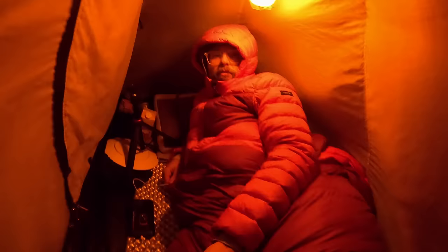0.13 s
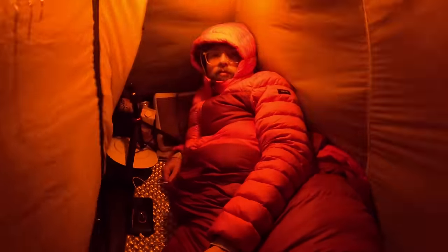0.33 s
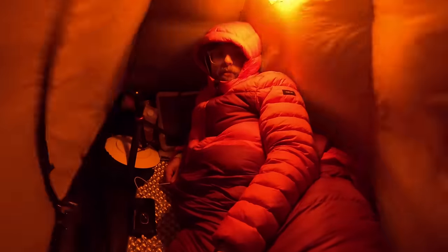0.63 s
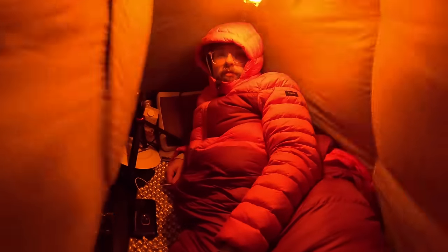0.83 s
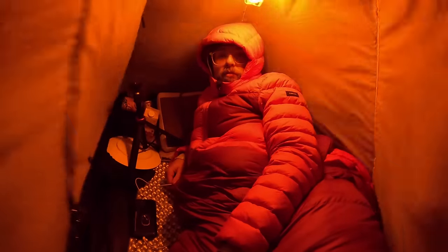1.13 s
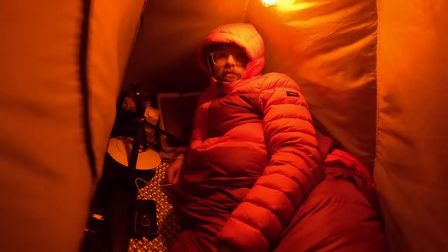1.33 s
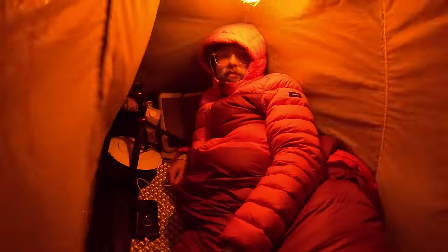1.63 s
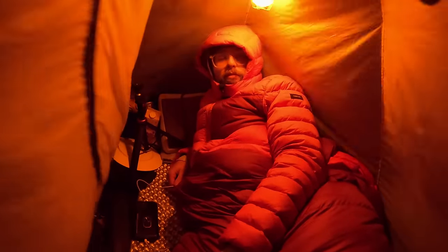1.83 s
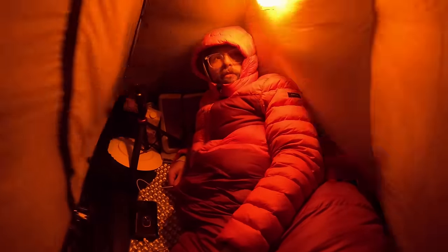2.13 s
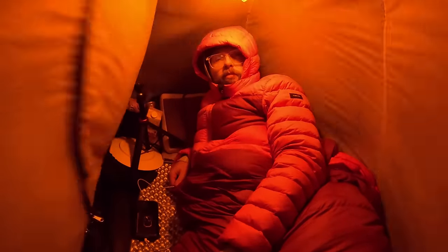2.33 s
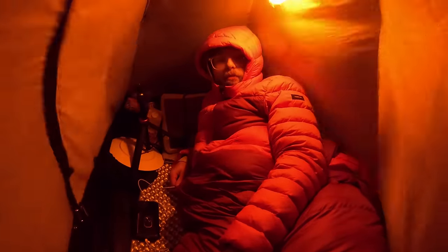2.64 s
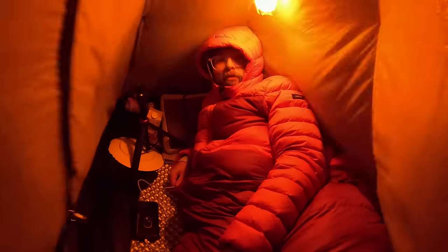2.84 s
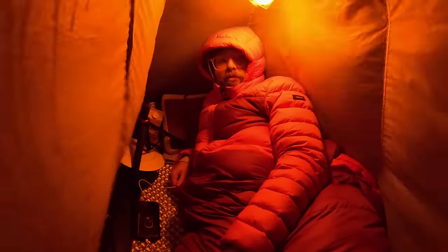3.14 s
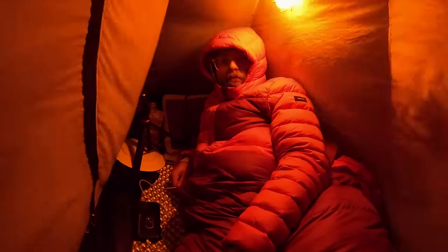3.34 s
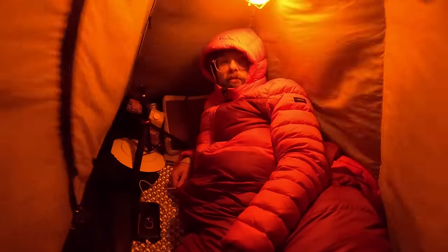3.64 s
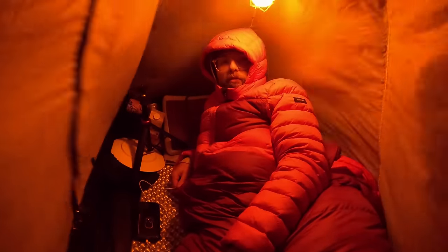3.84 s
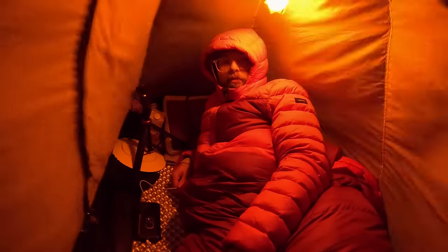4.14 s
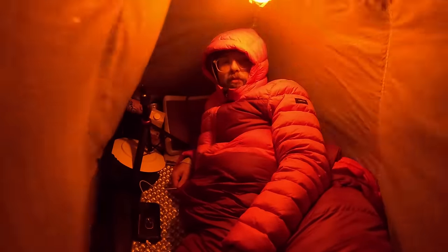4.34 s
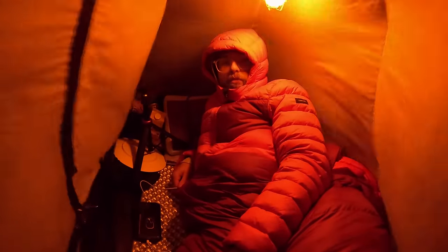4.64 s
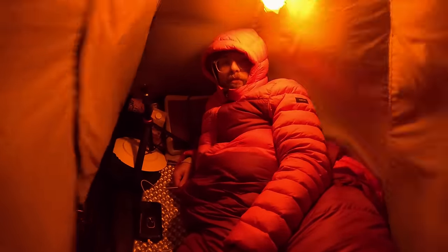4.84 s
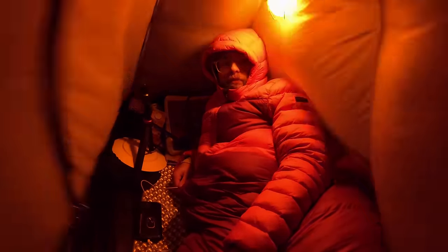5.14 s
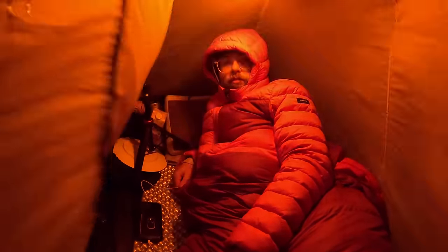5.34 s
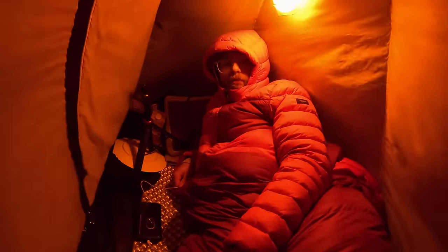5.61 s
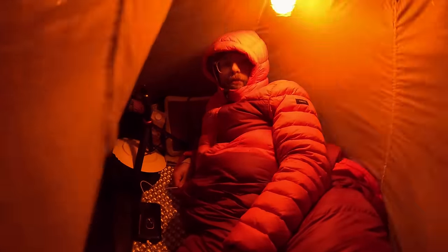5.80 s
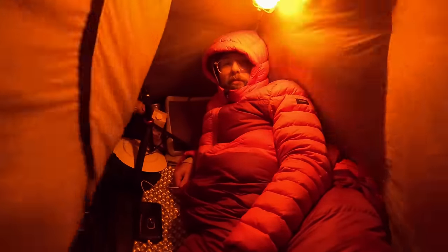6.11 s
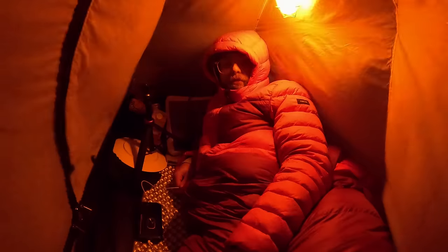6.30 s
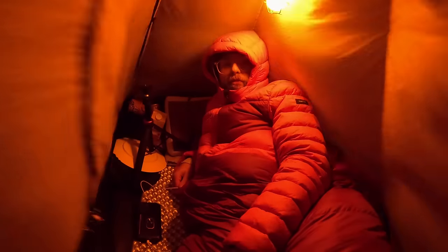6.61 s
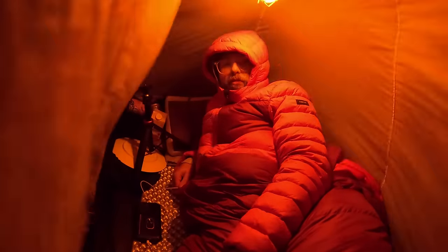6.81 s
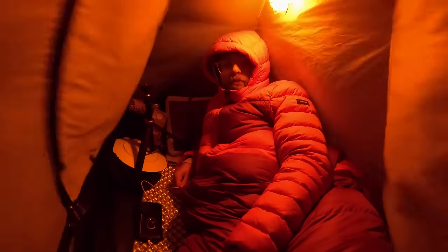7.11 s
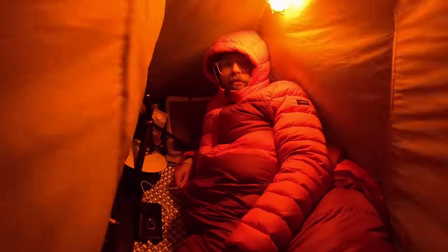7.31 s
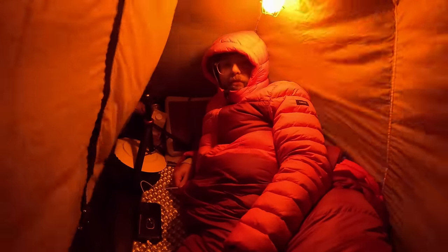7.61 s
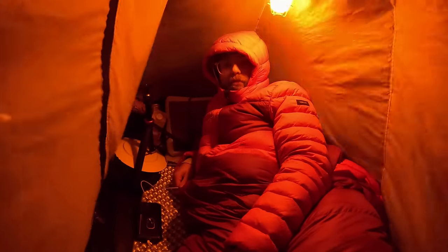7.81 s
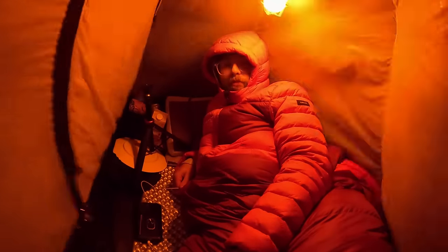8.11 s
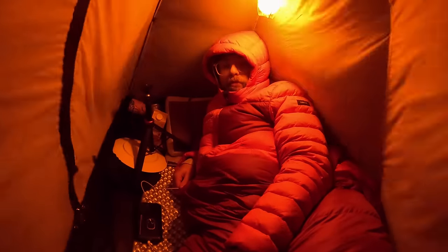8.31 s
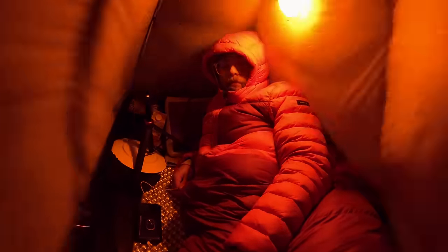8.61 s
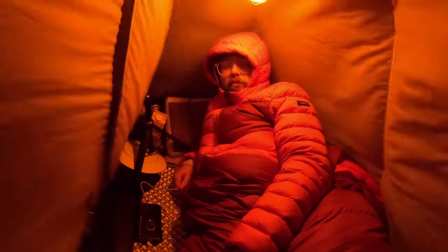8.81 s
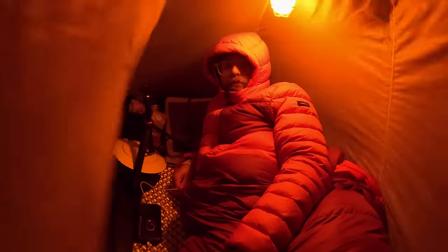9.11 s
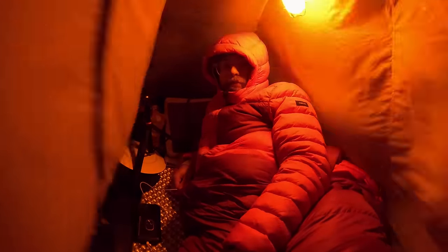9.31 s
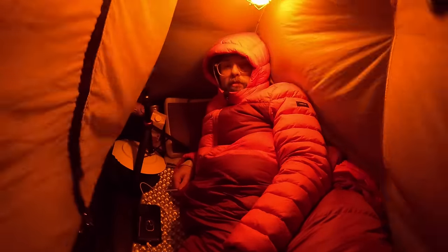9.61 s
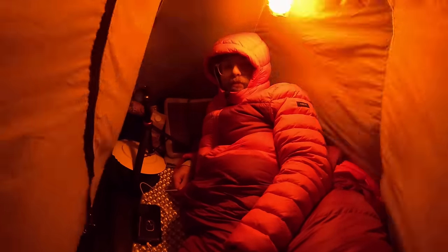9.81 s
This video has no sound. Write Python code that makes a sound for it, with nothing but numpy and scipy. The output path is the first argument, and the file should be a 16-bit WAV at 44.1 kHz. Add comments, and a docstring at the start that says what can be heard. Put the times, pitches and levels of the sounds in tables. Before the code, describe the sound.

Inside a small tent in a gale, fabric walls boom, flap and rustle constantly, with sharp cloth cracks, dull panel thumps and faint zip jingles.

```python
"""Inside a small tent in a gale: the walls boom, flap and rustle, and small things snap on top.
Boom, flapping roar and rustle are banded stereo noise that swells with heaves, flaps and sweeps; snaps crackle in the rustle.
Taut cloth cracks (ringing knock plus torn noise), slack panels thump (short pitched puffs over a low push of air),
and zip pulls jingle (decaying sine modes). A small stereo microphone cuts the deep bass and has dips near 4 and 11 kHz."""
import sys
import numpy as np
from scipy import signal
from scipy.io import wavfile

SR = 44100
rng = np.random.default_rng(int(sys.argv[2]) if len(sys.argv) > 2 else 0)


def output_pcm(signal):
    """Save a mono or channel-first signal as 16-bit PCM at the path in sys.argv[1].

    Samples are clipped to [-1, 1] before scaling.
    """
    pcm = np.clip(np.atleast_2d(signal).T, -1, 1) * 32767
    wavfile.write(sys.argv[1], SR, np.round(pcm).astype(np.int16))


N = 438794   # length in samples

# Strength of the gale between the single swells. Each row: time in seconds, flapping in dB, rustle in dB.
GALE_STRENGTH = [(0.0, -24.5, -32.5), (0.61, -24.5, -38), (0.83, -32, -42), (1.13, -25.5, -49),
                 (2.77, -29.5, -32), (3.55, -26.5, -37), (4.1, -25, -40.5), (4.41, -25.5, -38),
                 (4.8, -19, -36), (5.06, -26, -36.5), (5.99, -27.5, -40.5), (6.76, -20, -31),
                 (7.32, -28, -34.5), (8.34, -23, -34.5), (8.62, -23, -30), (9.36, -38, -38),
                 (9.95, -20.5, -30.5)]
BOOM_DB, BOOM_FOLLOWS = -18.5, 0.72   # boom at the mean flapping level, share of the flapping's dB swing

# A wall shoves the air inside. Each row: peak time in seconds, boom level in dB, length in seconds.
WALL_HEAVES = [(0.616, -14.5, 0.53), (0.899, -21, 0.027), (1.039, -14, 0.081), (1.326, -13, 0.058),
               (1.504, -12.5, 0.066), (1.794, -12.5, 0.091), (2.261, -5, 0.024), (2.703, -15, 0.43),
               (2.935, -13.5, 0.24), (3.2, -12, 0.064), (3.895, -14.5, 0.4), (4.155, -19, 0.075),
               (4.721, -17, 0.25), (5.01, -10, 0.059), (5.216, -17, 0.16), (6.309, -11, 0.11),
               (7.136, -15, 0.1), (7.492, -12, 0.033), (8.14, -10, 0.079), (8.347, -15, 0.25),
               (8.688, -10.5, 0.056), (9.057, -10.5, 0.12), (9.359, -18, 0.61), (9.622, -14, 0.12)]
# A wall billows and whips back. Each row: peak time in seconds, flapping level in dB, length in seconds.
WALL_FLAPS = [(0.232, -18.5, 0.14), (0.466, -16, 0.039), (0.621, -17, 0.48), (1.357, -21.5, 0.25),
              (1.914, -20, 0.22), (2.027, -21.5, 0.072), (2.252, -20, 0.42), (2.42, -12.5, 0.05),
              (2.844, -17.5, 0.75), (3.295, -16.5, 0.13), (3.839, -16, 0.31), (4.73, -20.5, 0.32),
              (5.017, -12.5, 0.025), (5.19, -21.5, 0.093), (5.511, -21.5, 0.08), (5.887, -22, 0.1),
              (6.269, -18, 0.11), (6.407, -10.5, 0.031), (6.59, -11, 0.08), (6.9, -12, 0.058),
              (7.421, -19, 0.087), (8.035, -13.5, 0.15), (8.52, -18.5, 0.065), (8.934, -16, 0.088),
              (9.212, -22.5, 0.57), (9.586, -19, 0.092), (9.806, -20, 0.13)]
# Cloth drags over cloth, or snow sweeps the walls. Each row: peak time in seconds, rustle level in dB,
# length in seconds.
CLOTH_SWEEPS = [(0.732, -31, 0.47), (1.095, -35.5, 0.3), (1.766, -35, 1), (2.033, -31, 0.2),
                (2.321, -34, 0.55), (2.698, -32, 0.19), (3.059, -30, 0.053), (3.703, -33, 0.11),
                (3.994, -31.5, 0.22), (4.683, -27.5, 0.35), (5.008, -24, 0.039), (5.246, -32, 0.41),
                (5.75, -47.5, 0.82), (5.909, -37.5, 0.1), (6.526, -29.5, 0.09), (6.9, -30, 0.13),
                (7.53, -33, 0.061), (8.074, -34, 0.063), (8.565, -34, 0.4), (8.956, -29, 0.065),
                (9.516, -30, 0.084), (9.676, -30, 0.079)]
RISE_SHARE, EDGE_DB = 0.52, 8.5   # share of a swell's length before its peak; drop at both ends of the length

# Colour of the boom. Each row: frequency in Hz, density in dB per Hz.
BOOM_SPECTRUM = [(22, -3), (40, -29), (50, -42), (62, 2.5), (90, 4), (140, -6), (200, -9.5), (300, -19.5)]
# Colour of the flapping. Each row: frequency in Hz, density in dB per Hz.
FLAP_SPECTRUM = [(120, -5), (200, -2), (400, -2), (700, -9), (1150, -11), (1800, -21.5), (2600, -32.5)]
# Colour of the rustle. Each row: frequency in Hz, density in dB per Hz.
RUSTLE_SPECTRUM = [(1200, 2.5), (1900, -1.5), (2900, -0.5), (4700, -6.5), (6500, -5.5), (9300, -12),
                   (11000, -35), (14200, -24), (15400, -26)]
TICKS_PER_S, TICK_DB = 200, -2   # crackle of the cloth: average rate, gain where it joins the rustle

# Stereo width of the cloth noise. Each row: frequency in Hz, left-right likeness from 0 to 1.
STEREO_LIKENESS = [(90, .99), (160, .95), (300, .975), (600, .9), (1400, .74), (2800, .56), (5600, .64),
                   (9000, .38), (12000, 0)]
# Stereo balance. Each row: frequency in Hz, left level over right in dB.
STEREO_LEAN = [(60, .5), (200, .2), (400, .6), (800, 2), (1500, 3.4), (2500, 3.4), (4500, 1.8), (8000, 3),
               (13000, 9)]
LEFT_LATE, LATE_BELOW_HZ = 2, 3500   # samples by which the left hears late; pitch limit for the cloth noise

# Cloth cracking taut. Each row: start in seconds, knock strength in dB, tear strength in dB.
CLOTH_CRACKS = [(0.2127, -17, -25), (0.3387, -18, -22.5), (0.465, -18, -29), (0.5605, -28, -36),
                (0.725, -21, -18), (1.278, -23, -15.5), (1.478, -13, -30), (1.646, -24, -26),
                (2.305, -13, -14.5), (2.455, -16.5, -22), (3.061, -19, -14), (3.452, -26, -40),
                (3.609, -16, -29), (3.6398, -18, -24), (3.69, -16, -30), (3.988, -26, -18.5),
                (4.102, -23, -42), (4.385, -22, -43), (4.4628, -18, -18), (4.6227, -20, -21),
                (4.647, -20, -35), (4.6654, -24, -22), (4.687, -13, -33), (4.707, -12.5, -37),
                (4.726, -18, -38), (4.752, -12, -35), (4.771, -20, -38), (4.888, -25, -26),
                (4.9147, -15, -22), (4.969, -17, -17), (5.0146, -10, -12), (5.05, -27, -38),
                (5.0945, -26, -39), (5.6397, -44, -28), (5.7084, -12, -15.5), (5.778, -40, -24),
                (5.81, -21, -31), (5.979, -37, -26), (6.138, -28, -26), (6.168, -24, -32), (6.514, -9, -16),
                (6.9, -11, -20), (6.944, -7.5, -33.5), (7.0107, -7, -21), (7.079, -15, -15.5),
                (7.4626, -17, -39), (7.529, -15.5, -17.5), (8.067, -11, -12.5), (8.266, -21, -24),
                (8.5682, -7.5, -16), (8.731, -34, -23), (8.757, -11.5, -73), (9.008, -11.5, -16.5),
                (9.225, -32, -27)]
# What a knock rings with. Each row: frequency in Hz, level in dB, time to fall 60 dB in seconds.
KNOCK_MODES = [(2850, 0, .025), (3600, -7, .02), (2350, -12, .015)]
# Slack panels thumping. Each row: start in seconds, slap strength in dB, pitch in Hz.
PANEL_THUMPS = [(0.346, -5, 455), (0.452, -6, 370), (0.558, -12, 610), (1.077, -11, 960), (1.455, -11, 503),
                (1.744, -10, 550), (2.022, -3.5, 380), (2.258, -6.5, 466), (2.304, -16, 810),
                (2.4, -5, 536), (2.417, -3.5, 543), (2.726, -6, 634), (3.018, -7, 420), (3.166, -9.5, 443),
                (3.278, -11, 770), (3.762, -5, 550), (3.79, -7, 328), (3.829, -9, 740), (3.951, -6.5, 840),
                (4.523, -7.5, 440), (4.622, -7.5, 980), (4.674, 0.5, 700), (4.708, -14, 350),
                (4.75, -8, 420), (4.915, -5, 1000), (5.027, -10, 900), (5.094, -8, 1070), (5.499, -21, 430),
                (5.551, -13.5, 516), (5.892, -12, 920), (6.331, -8, 960), (6.4, -10, 410),
                (6.499, -5.5, 1010), (6.563, -2, 403), (6.648, -9.5, 894), (6.904, -2, 1110),
                (7.023, -8, 900), (7.055, -1.5, 403), (7.076, -4, 880), (8.03, -1.5, 443),
                (8.401, -10, 586), (8.572, -6, 418), (8.929, -7, 530), (9.205, -6.5, 386),
                (9.748, -8.5, 890), (9.798, -8, 610), (9.835, -8, 680), (9.938, -4, 690)]
# Zip pulls knocking together. Each row: start in seconds, then the strengths in dB of the first tag's low modes,
# of its top modes, and of the second tag.
ZIP_JINGLES = [(0.548, -25, -63, -47), (0.608, -22, -71, -48), (0.6424, -26, -63, -34),
               (0.691, -28, -62, -35), (0.734, -21, -55, -27), (0.818, -27, -62, -49),
               (0.848, -27, -60, -48), (0.8864, -25, -35, -31), (1.021, -16, -34, -28),
               (1.056, -31, -35, -53), (3.335, -19.5, -35, -42), (3.3687, -45, -70, -27),
               (4.8884, -24, -26, -21), (5.237, -22, -42, -25), (5.255, -23, -26, -47),
               (5.4294, -21, -34, -31), (6.2537, -24, -64, -33), (6.93, -29, -54, -40),
               (6.9814, -23, -55, -41), (7.094, -15, -53, -48), (7.11, -21, -28, -47),
               (8.2716, -21, -31, -23), (8.7316, -19, -21, -21), (9.0244, -32, -50, -22),
               (9.2964, -38, -70, -27)]
# Ringing modes of the zip pulls. Each row: frequency in Hz, level in dB, time to fall 60 dB in seconds,
# and which strength drives it (0 low modes, 1 top modes, 2 second tag).
ZIP_MODES = [(5880, -4, .06, 0), (6140, -9, .05, 0), (8350, -15, .04, 0), (14050, -4, .045, 1),
             (14260, -6, .05, 1), (4700, -9, .07, 2), (9150, -6, .055, 2), (11450, -19, .05, 2)]
RATTLE_S, RATTLE_LOSS_DB = .022, 8   # longest-gap scale, before a random share; mean loss at each bounce

# Dips in the microphone's response. Each row: frequency in Hz, width in Hz, depth from 0 to 1.
MIC_DIPS = [(4003, 490, 1), (10740, 1700, 0.55)]
BASS_CUT_HZ, TREBLE_ROLL_HZ, CUTOFF_HZ = 45, 14100, 15500


def from_db(db):
    """Decibels to gain."""
    return 10 ** (np.asarray(db) / 20)


def rms_one(x):
    """Scale to rms 1."""
    return x / np.sqrt(np.mean(x ** 2) + 1e-20)


def in_time(rows):
    """Columns of a curve, one value per sample."""
    s, *columns = np.transpose(rows)
    return [np.interp(np.arange(N) / SR, s, c) for c in columns]


def at_hz(points, hz):
    """Read a curve on a log-frequency axis."""
    point_hz, value = np.array(points).T
    return np.interp(np.log(hz), np.log(point_hz), value)


def drift(rate_hz):
    """Slow chance: noise at every 40th sample through a double one-pole low-pass; rms 1."""
    r = np.exp(-80 * np.pi * rate_hz / SR)
    noise = rng.standard_normal(N // 40 + 2002)
    slow = signal.lfilter([1], [1, -2 * r, r * r], noise)[2000:]   # skip the filter's start-up
    return np.interp(np.arange(N) / 40, np.arange(len(slow)), rms_one(slow))


def band(x, low_hz, high_hz):
    """Butterworth band-pass."""
    edges_hz = [low_hz, min(high_hz, .45 * SR)]
    return signal.sosfilt(signal.butter(2, edges_hz, "band", fs=SR, output="sos"), x)


def sides(lean_db):
    """Left and right gains for a left-right difference."""
    return from_db(np.array([[.5], [-.5]]) * lean_db)


def swells(rows):
    """Power of bell-shaped swells, each falling off on both sides of its peak."""
    t, power = np.arange(N) / SR, np.zeros(N)
    for s, db, length_s in rows:
        first, last = round((s - 3 * length_s) * SR), round((s + 3 * length_s) * SR)
        near = slice(max(0, first), last)
        reach = length_s * np.where(t[near] < s, RISE_SHARE, 1 - RISE_SHARE)
        power[near] += from_db(db - EDGE_DB * ((t[near] - s) / reach) ** 2) ** 2
    return power


def swelling_gain(steady_db, rows):
    """Add the power of the swells to that of the steady level."""
    return np.sqrt(from_db(2 * steady_db) + swells(rows))


def crumpling(per_s, spread_db, t60, share):
    """Envelope of random folds in the cloth: sudden small bursts of uneven size over a steady part."""
    struck = rng.random(N) < per_s / SR
    sizes = from_db(spread_db * np.minimum(rng.exponential(1, N), 4)) * struck
    bursts = signal.lfilter([1], [1, -from_db(-60 / (t60 * SR))], sizes + 1e-18)
    share = np.clip(share, 0, 1)
    return rms_one(1 - share + share * rms_one(bursts))


def cloth_noise(spectrum, shared_db, own_db, own_rate, envelope=1):
    """Third-octave bands of stereo noise, each with its level, flicker, likeness and lean; rms 1."""
    low_end, high_end = spectrum[0][0], spectrum[-1][0]
    count = int(3 * np.log2(high_end / low_end)) + 1
    edges = np.geomspace(low_end, high_end, count)
    white = rng.standard_normal((2, 2, N)) * envelope   # neighbouring bands get unrelated noise
    out, together = 0, drift(13.0)
    for k, (low, high) in enumerate(zip(edges, edges[1:])):
        mid, side = band(white[k % 2], low, high)
        hz = np.sqrt(low * high)
        alike = np.clip(at_hz(STEREO_LIKENESS, hz), 0, .99)
        flicker_db = shared_db * together + own_db * drift(own_rate)
        gain = from_db(at_hz(spectrum, hz) + flicker_db)
        pair = np.sqrt(1 + alike) * mid + np.sqrt(1 - alike) * side * [[1], [-1]]
        pair[0] = np.roll(pair[0], LEFT_LATE * (hz < LATE_BELOW_HZ))
        out = out + gain * sides(at_hz(STEREO_LEAN, hz)) * pair
    return rms_one(out)


def boom(flap_db):
    """Walls pump like drum skins: low noise that follows the gale and swells with each heave."""
    steady_db = BOOM_DB + BOOM_FOLLOWS * (flap_db - flap_db.mean())
    noise = cloth_noise(BOOM_SPECTRUM, shared_db=0.6, own_db=0.9, own_rate=4.2)
    return swelling_gain(steady_db, WALL_HEAVES) * noise


def flapping(flap_db):
    """Walls flap and crumple: a mid-range roar roughened by dense folds, swelling with each flap."""
    folds = crumpling(350.0, 5, 0.008, 0.45)
    noise = cloth_noise(FLAP_SPECTRUM, shared_db=0.6, own_db=1.8, own_rate=12.0, envelope=folds)
    return swelling_gain(flap_db, WALL_FLAPS) * noise


def crackle(per_s):
    """Random small snaps of uneven size, each ringing a few cycles at one of ten pitches."""
    struck = rng.random(N) < per_s / SR
    touches = from_db(4.5 * np.minimum(rng.exponential(1, N), 3)) * struck
    out, dealt = 0, rng.integers(0, 10, N)
    for k, hz in enumerate(np.geomspace(1300, 5200, 10)):
        r, w = from_db(-60 * hz / (8 * SR)), 2 * np.pi * hz / SR   # falls 60 dB in 8 cycles
        snaps = touches * (dealt == k) + 1e-18
        ring = signal.lfilter([np.sin(w)], [1, -2 * r * np.cos(w), r * r], snaps)
        out = out + sides(at_hz(STEREO_LEAN, hz) + rng.normal(0, 2)) * ring
    return out


def rustle(rustle_db):
    """Rubbing cloth and blasted snow: bright noise with sparser folds and crackle, swelling with each sweep."""
    folds = crumpling(90.0, 3.5, 0.014, 0.2)
    noise = cloth_noise(RUSTLE_SPECTRUM, shared_db=1.0, own_db=2.1, own_rate=20.0, envelope=folds)
    texture = noise + from_db(TICK_DB) * crackle(TICKS_PER_S)
    return swelling_gain(rustle_db, CLOTH_SWEEPS) * texture


def puff(low_hz, high_hz, rise_s, t60, apart, click):
    """One short stereo burst, mono peak 1: a sudden click, then band noise that dies away; steep skirts."""
    t = np.arange(int(.12 * SR)) / SR
    envelope = (1 - np.exp(-t / rise_s)) * from_db(-60 * t / t60)
    mid, side = rng.standard_normal((2, len(t))) * envelope
    mid[0] = click * np.sqrt(SR / (high_hz - low_hz))   # sized against the noise that the band lets through
    pair = band(mid + apart * side * [[1], [-1]], low_hz, high_hz)
    pair = band(pair, low_hz / 2, high_hz * 1.3)
    return pair / np.abs(pair.mean(axis=0)).max()


def add(out, s, burst):
    """Mix a burst in at time s."""
    at = round(s * SR)
    out[:, at:at + burst.shape[1]] += burst[:, :N - at]


def knock():
    """A brief ring of the knock modes, shifted in pitch and strength every time; peak 1, left late."""
    t, shift = np.arange(int(.12 * SR)) / SR, 1 + rng.normal(0, .05)
    ring = 0
    for hz, db, t60 in KNOCK_MODES:
        decay = from_db(db + rng.normal(0, 3) - 60 * t / t60)
        ring = ring + decay * np.sin(2 * np.pi * (hz * shift * t + rng.random()))
    ring = ring * (1 - np.exp(-t / .0012))   # soft attack
    return np.array([np.roll(ring, LEFT_LATE), ring]) / np.abs(ring).max()


def cracks():
    """A ringing knock near 3 kHz, and a tearing burst with a duller body, each with its own strength."""
    out = np.zeros((2, N))
    for s, knock_db, tear_db in CLOTH_CRACKS:
        snap = .7 * puff(1800, 3800, .0015, .03, apart=.55, click=.8)
        ring = from_db(knock_db - 6) * (knock() + snap)
        tear = from_db(tear_db) * puff(3500, 7600, 0.002, 0.025, apart=0.46, click=.6)
        body = from_db(tear_db + 2.0) * puff(570, 2370, 0.0039, 0.059, apart=.45, click=1)
        add(out, s, sides(2.8) * (ring + body + tear))
    return out


def thumps():
    """A slap of a few cycles around the panel's pitch, with a low push of air under it."""
    out = np.zeros((2, N))
    for s, db, hz in PANEL_THUMPS:
        slap = puff(hz / 1.9, hz * 1.9, .001, .032, apart=.35, click=1.5)
        push = from_db(-7) * puff(140.0, 226, 0.0017, 0.24, apart=0.057, click=1.35)
        add(out, s, sides(0.92) * from_db(db) * (slap + push))
    return out


def jingles():
    """Each knock and its two bounces ring small metal tags, a little off in pitch and strength every time."""
    out, t = np.zeros((2, N)), np.arange(int(.15 * SR)) / SR
    swell = 1 - np.exp(-t / 0.004)   # soft attack
    for s, *strength_db in ZIP_JINGLES:
        touches = np.cumsum([0, *rng.uniform(0.38, 0.85, 2)]) * RATTLE_S
        for hz, mode_db, t60, column in ZIP_MODES:
            pitch = hz * (1 + rng.normal(0, 0.008))
            # close mode pairs beat
            waver = 1 + .6 * np.sin(2 * np.pi * (rng.uniform(60, 250) * t + rng.random()))
            decay = from_db(strength_db[column] + mode_db - 60 * t / t60)
            tone = decay * swell * np.sin(2 * np.pi * pitch * t) * waver
            for k, late_s in enumerate(touches):
                touch_gain = from_db(rng.normal(0, 3) - RATTLE_LOSS_DB * k)
                add(out, s + late_s, sides(at_hz(STEREO_LEAN, hz)) * touch_gain * tone)
    return out


def scene():
    """Boom, flapping and rustle follow the gale; cracks, thumps and jingles sit on top."""
    flap_db, rustle_db = in_time(GALE_STRENGTH)
    walls = boom(flap_db) + flapping(flap_db) + rustle(rustle_db)
    return walls + cracks() + thumps() + jingles()


def record(dry):
    """Bass cut, two dips of the housing, a treble roll-off, rounded peaks and a steep top cut."""
    x = signal.sosfilt(signal.cheby2(4, 22, BASS_CUT_HZ, "high", fs=SR, output="sos"), dry)
    for hz, width_hz, depth in MIC_DIPS:
        x = x - min(depth, 1) * signal.lfilter(*signal.iirpeak(hz, hz / width_hz, fs=SR), x)
    x = signal.sosfilt(signal.butter(10, TREBLE_ROLL_HZ, fs=SR, output="sos"), x)
    x = 1.05 * np.tanh(x / 1.05)
    return signal.sosfilt(signal.cheby2(20, 60, CUTOFF_HZ, fs=SR, output="sos"), x)


dry = scene()
out = record(dry)
output_pcm(out)
```